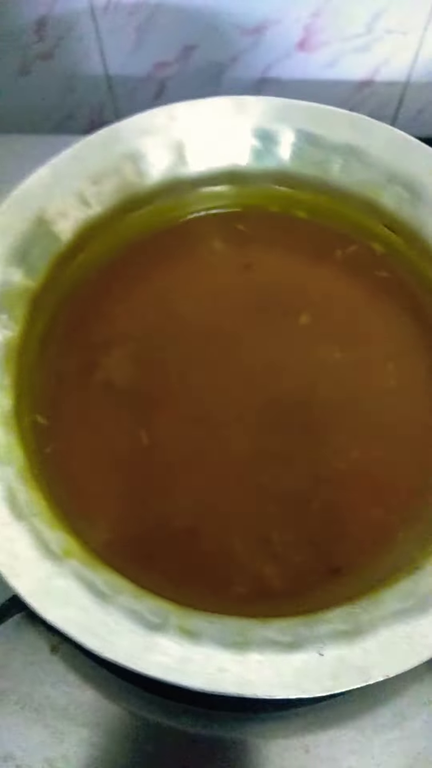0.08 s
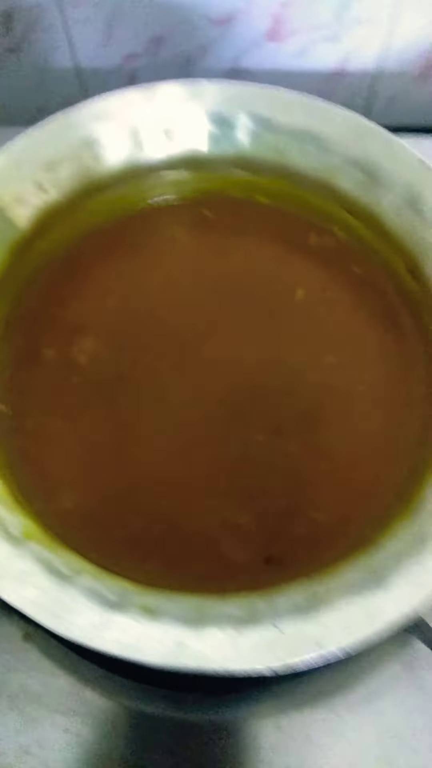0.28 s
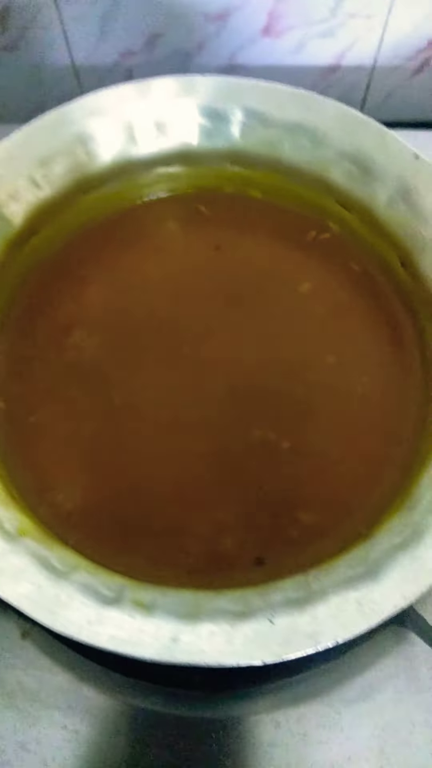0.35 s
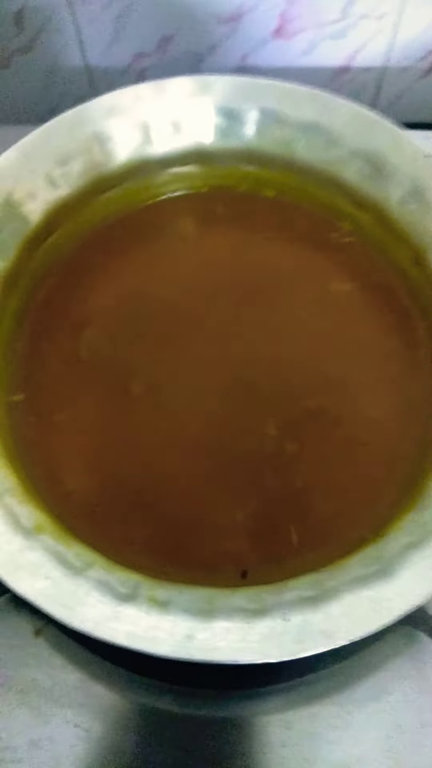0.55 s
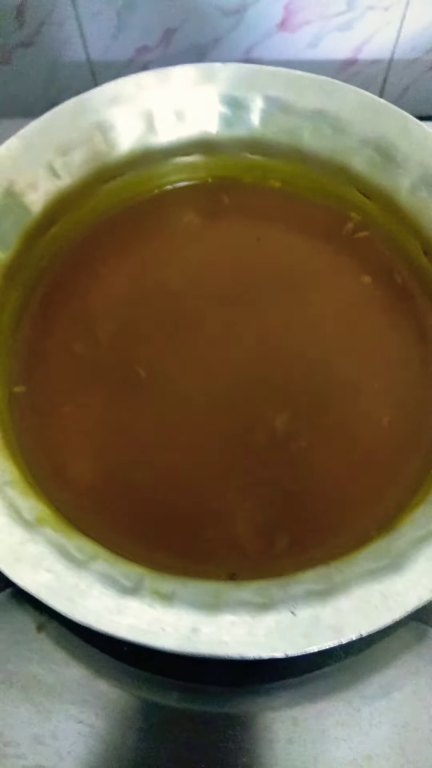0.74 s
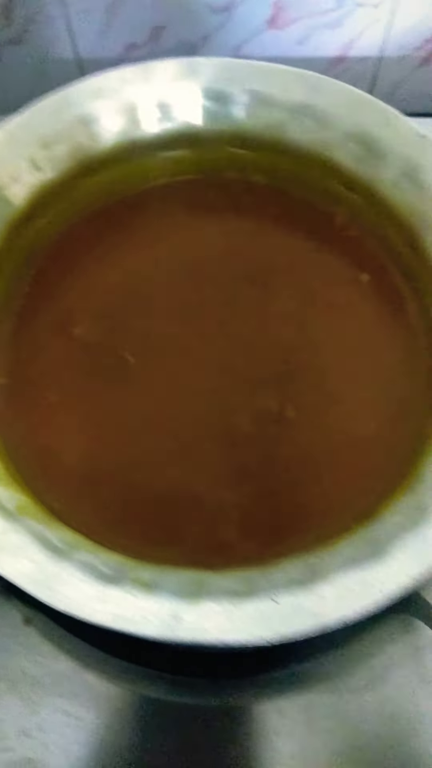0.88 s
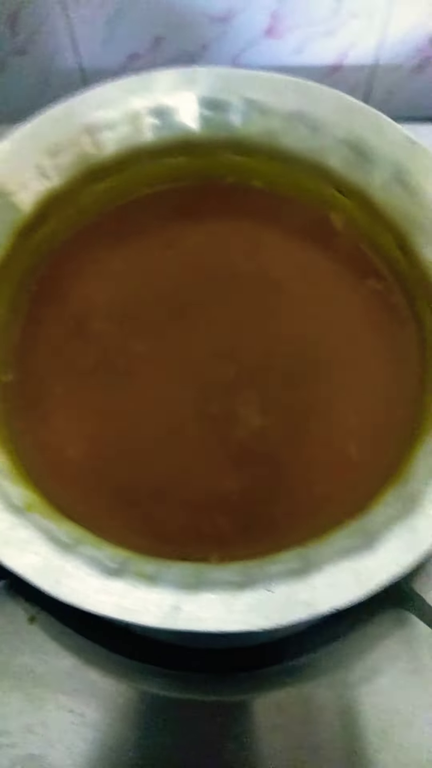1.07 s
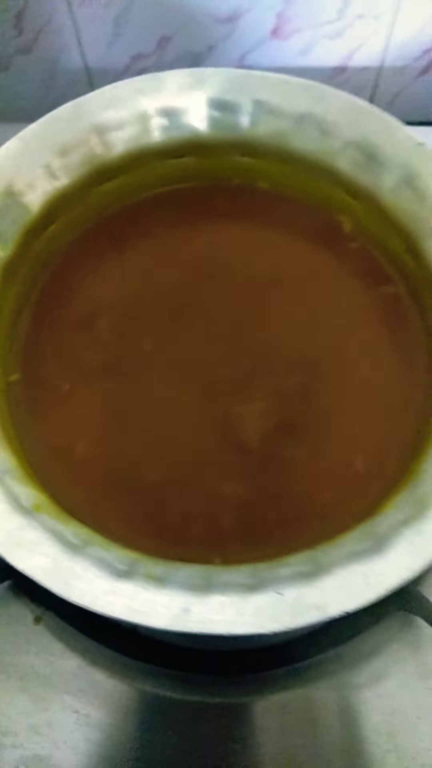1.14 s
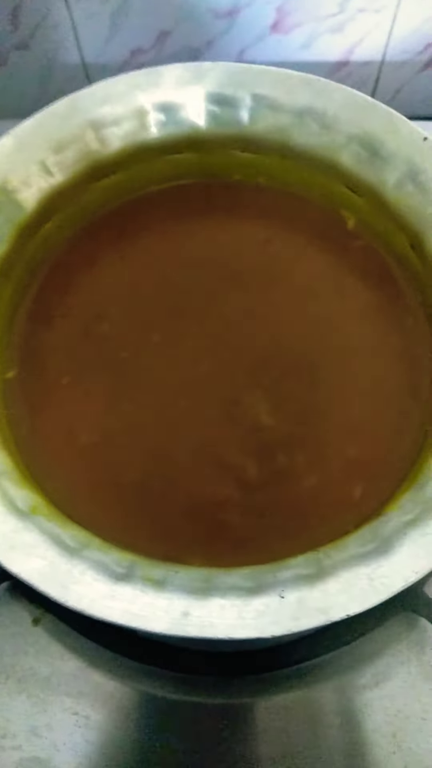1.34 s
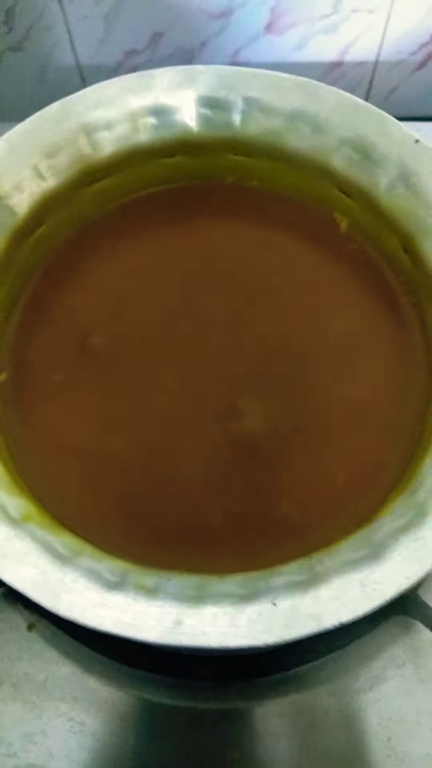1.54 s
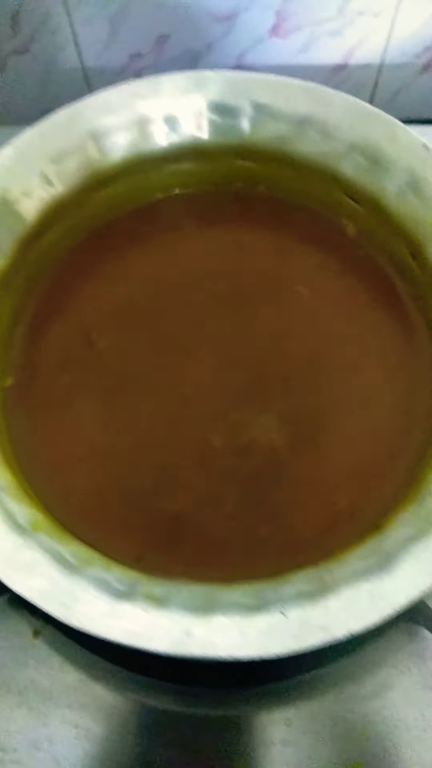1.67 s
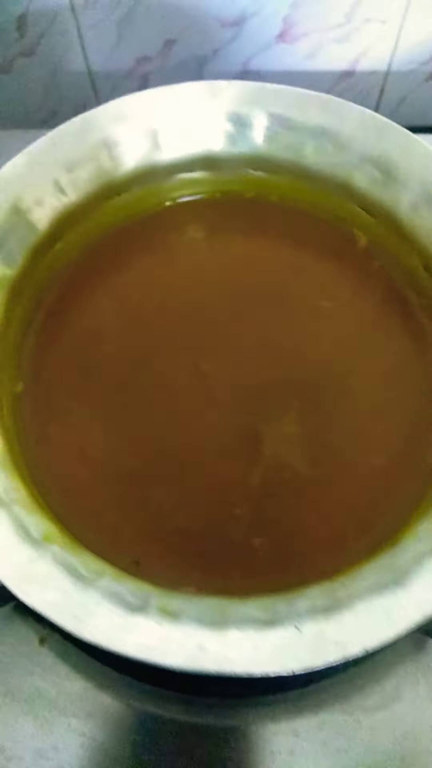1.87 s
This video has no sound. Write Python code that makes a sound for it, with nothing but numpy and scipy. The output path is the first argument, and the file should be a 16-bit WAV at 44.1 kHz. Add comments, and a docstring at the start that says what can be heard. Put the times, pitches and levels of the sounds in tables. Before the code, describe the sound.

Close up in a home kitchen, tongs clang against a heavy liquid-filled pot, rattle brightly and knock again within half a second, then only low wavering drone, quiet hum and tiny hollow blips remain.

```python
"""A full aluminium pot on a gas stove clangs under four knocks of metal tongs, two of them lighter.
Each knock mixes noisy clatter, dying tones, a low thud and a boom of the stove top.
The tongs clink in bright ticks of noise, with ringing blades and a short tiled-kitchen tail.
Behind them: soft blips made of sine tones and rustle, a faint mains hum, a wavering low drone,
a thin whine and room noise."""
import sys
import numpy as np
from scipy import signal
from scipy.fft import rfft, irfft
from scipy.io import wavfile
from scipy.ndimage import uniform_filter1d

SR = 44100
rng = np.random.default_rng(int(sys.argv[2]) if len(sys.argv) > 2 else 0)


def inscribe(sig):
    """Save sig as 16-bit PCM at rate SR to the path in sys.argv[1].

    A 1-D sig is mono; a 2-D sig holds one channel per row.
    Samples are clipped to [-1, 1] before scaling.
    """
    pcm = np.round(np.clip(np.atleast_2d(sig).T, -1, 1) * 32767)
    wavfile.write(sys.argv[1], SR, pcm.astype(np.int16))


N = 83790
T = np.arange(N) / SR  # time in seconds

# A t60 is the time a sound takes to fall by 60 dB.
# Levels in the tables apply before the attacks, the decays and the expander in record().


def amp(db):
    """Turns decibels into a gain."""
    return 10 ** (np.asarray(db) / 20)


def unit(x):
    """Scales a sound to an rms of 1."""
    return x / np.sqrt(np.mean(x ** 2) + 1e-20)


def read(points, hz):
    """Reads a table at any frequency, joining its points on a log-frequency axis."""
    point_hz, value = np.transpose(points)
    return np.interp(np.log(hz + 1), np.log(point_hz + 1), value)


def level_curve(points):
    """Joins (time, dB) points with straight lines, giving a level in dB at every moment."""
    return np.interp(T, *np.transpose(points))


def add(mix, start_s, sound):
    """Mixes a sound in at its start time, cutting it off at the end of the scene."""
    part = mix[max(round(start_s * SR), 0):][:len(sound)]
    part += sound[:len(part)]


def fade(t60_s, t=T):
    """Exponential decay, as in a struck object losing its energy."""
    return np.exp(-np.log(1000) * t / t60_s)


def rise(rise_s):
    """Straight-line attack from 0 to 1."""
    return np.minimum(T / max(rise_s, 1 / SR), 1)


TOP_FROM_HZ, TOP_FULL_HZ = 7500, 11000  # the treble lift begins, and is complete


def noise(colour, top_db=0):
    """Noise with random phases and a given colour; top_db raises or lowers its treble."""
    hz = np.fft.rfftfreq(N, 1 / SR)
    spectrum = np.exp(2j * np.pi * rng.random(len(hz))) * amp(read(colour, hz))
    lift = amp(read([(TOP_FROM_HZ, 0), (TOP_FULL_HZ, top_db)], hz))
    # level is set before the lift, so the lift leaves the lower range alone
    return irfft(spectrum * lift, N) / np.std(irfft(spectrum, N))


def drift(rate_hz):
    """Slow random movement of rms 1: noise with its fast changes smoothed away."""
    hz = np.fft.rfftfreq(N, 1 / SR)
    smooth = np.exp(-(hz / rate_hz) ** 2)
    return unit(irfft(rfft(rng.standard_normal(N)) * smooth, N))


def ring(modes, top_db=0):
    """Metal vibrates in several modes at once: each is a sine that dies at its own speed."""
    out = np.zeros(N)
    for pitch_hz, level_db, t60_s in modes:
        gain = amp(level_db + top_db * (pitch_hz > TOP_FULL_HZ))
        out += gain * fade(t60_s) * np.sin(2 * np.pi * (pitch_hz * T + rng.random()))
    return out


def wavering(levels, pitch_hz, wander_hz, rough):
    """A tone unsteady in pitch (rms wander_hz) and strength (rms rough), on a level curve."""
    turns = np.cumsum(pitch_hz + wander_hz * drift(39)) / SR
    tone = np.sin(2 * np.pi * turns) * (1 + rough * drift(40))
    return amp(level_curve(levels)) * unit(tone)


# knocks on the pot: start_s, clatter_db, clatter_rise_s, ring_db, boom_db, thud_db, thump_hz, thump_db
KNOCK_TABLE = [(0.2354, -23, 0.016, -21.5, -42, -27, 768.3, -23.5),
               (.377, -40.5, 0.0023, -53.5, -43.5, -58, 555, -35),
               (0.4863, -34, 0.0032, -43.5, -34, -57, 563.3, -27),
               (.5055, -44.5, .002, -46, -60.5, -57, 567, -36.5)]
# ringing modes of the pot: pitch_hz, level_db (relative), t60_s
POT_MODES = [(382, -7, .24), (456, -1, .3), (488, -4, .28), (524, -6, .4), (587, -2, .28), (623, -2, .3),
             (698, 2, .28), (813, -3, .26), (829, -1, .34), (863, -6, .38), (1029, -8, .32), (1352, -9, .3),
             (1478, -12, .3), (1641, -9, .3), (2676, -18, .28), (3911, -17, .3)]
RING_RISE_S = 0.0111


def pot():
    """Each knock swells into a dense clatter, rings the pot's modes and shakes the stove."""
    out = np.zeros(N)
    for start_s, clatter_db, rise_s, ring_db, boom_db, thud_db, thump_hz, thump_db in KNOCK_TABLE:
        add(out, start_s, clatter(clatter_db, rise_s))
        add(out, start_s, amp(thump_db) * thump(thump_hz))
        add(out, start_s, amp(ring_db) * ring(POT_MODES) * rise(RING_RISE_S))
        add(out, start_s, amp(boom_db) * boom())
        add(out, start_s, amp(thud_db) * thud())
    return out


# colour of the dense clatter of pot and grate: pitch_hz, level_db (per Hz, relative)
CLATTER_COLOUR = [(60, -44), (200, -15), (340, -18), (540, -1.5), (740, -9.5), (830, -3.5), (960, -9.5),
                  (1600, -11.5), (2050, -14), (3050, -16), (3400, -25), (5000, -17.5), (6700, -23),
                  (9200, -42.5), (13500, -41.5), (15000, -49.5)]


def clatter(level_db, rise_s):
    """Many small metal contacts blur into noise that starts partly up and swells."""
    swell = 0.28 + 0.83 * rise(rise_s)
    return amp(level_db) * die_away(noise(CLATTER_COLOUR)) * swell


# decay of sound in the kitchen: pitch_hz, t60_s
KITCHEN_DECAY = [(100, 0.45), (600, 0.38), (1200, 0.37), (2500, 0.34), (6500, 0.32), (10000, 0.33),
                 (15000, .33)]


def die_away(x):
    """Lets each frequency band decay at the speed it has in the kitchen."""
    hz, t, bands = signal.stft(x, SR, nperseg=256)
    band_t60_s = read(KITCHEN_DECAY, hz)[:, None]
    return signal.istft(bands * fade(band_t60_s, t), SR)[1][:N]


THUMP_WIDTH_HZ, THUMP_T60_S, THUMP_RISE_S = 120, 0.14, 0.0073


def thump(pitch_hz):
    """A brief band of noise around a pitch that depends on the spot struck."""
    # two slow drifts on a sine and a cosine spread the tone into a narrow band
    sine_part = drift(THUMP_WIDTH_HZ) * np.sin(2 * np.pi * pitch_hz * T)
    cosine_part = drift(THUMP_WIDTH_HZ) * np.cos(2 * np.pi * pitch_hz * T)
    return unit(sine_part + cosine_part) * fade(THUMP_T60_S) * rise(THUMP_RISE_S)


# colour of the stove's rumble under the boom: pitch_hz, level_db (per Hz, relative)
RUMBLE_COLOUR = [(20, -16), (55, -7), (110, 3), (170, -5), (300, -34.5), (1000, -70)]
RUMBLE_DB, RUMBLE_T60_S = -11.5, .85  # level relative to the boom's tone
BOOM_HZ, BOOM_WANDER_HZ, BOOM_ROUGH = 143.55, 2, .15
BOOM_RISE_S, BOOM_T60_S = .014, .9
BOOM_HOLD_S, BOOM_STOP_T60_S = .145, .17  # after the hold, this extra decay sets in


def boom():
    """The heavy pot shakes on the stove top for a moment, then settles."""
    shake = wavering([(0, 0.0083)], BOOM_HZ, BOOM_WANDER_HZ, BOOM_ROUGH) * fade(BOOM_T60_S)
    settle = fade(BOOM_STOP_T60_S, np.maximum(T - BOOM_HOLD_S, 0))
    rumble = amp(RUMBLE_DB) * noise(RUMBLE_COLOUR) * fade(RUMBLE_T60_S)
    return rise(BOOM_RISE_S) * (shake * settle + rumble)


# colour of the grate's low thud: pitch_hz, level_db (per Hz, relative)
THUD_COLOUR = [(25, -50.5), (65, -28.5), (110, -6.5), (180, -5), (240, -1), (380, -0.5), (700, -25),
               (2000, -50.5)]
THUD_T60_S, THUD_RISE_S = 0.31, 0.0033


def thud():
    """The grate gives a low thud: dark noise with a quick attack and a short decay."""
    return noise(THUD_COLOUR) * fade(THUD_T60_S) * rise(THUD_RISE_S)


# clinks of the tongs: start_s, level_db, treble_lift_db, tick_t60_s, room_db (relative to the tick)
CLINK_TABLE = [(0.2366, -32.5, 1, 0.062, -7.5), (0.2401, -29, -0.5, 0.077, -9.5),
               (0.3223, -40.5, 8, 0.025, -13), (.334, -34.5, 1.5, 0.025, -8.5), (0.346, -43, -2, .03, -5.5),
               (0.379, -42.5, -3, .035, -8), (0.3841, -49, 6, 0.022, -9),
               (0.4864, -25.5, -11, 0.014, -11.5), (0.493, -42, 1.5, 0.034, -8.5),
               (.5008, -36, 11, 0.055, -13)]
# colour of the tongs: pitch_hz, level_db (per Hz, relative)
TONGS_COLOUR = [(300, -25.5), (1200, 1), (2700, -3.5), (3600, -8.5), (5000, -8.5), (6500, 4), (7800, -5.5),
                (9300, -15.5), (11300, -16), (13000, -19.5), (14200, -22), (15500, -37)]
# ringing modes of the tongs' blades: pitch_hz, level_db (relative), t60_s
BLADE_MODES = [(1938, -14, .33), (2730, -18, .28), (5870, -18, .3), (5995, -18, .3), (6400, -17, .33),
               (6768, -15, .34), (12850, -32, .32)]
BLADES_DB = 3  # blades against the room tail


def tongs():
    """Each contact is a short bright tick, the ring of the blades and a tail from the room."""
    out = np.zeros(N)
    for start_s, level_db, top_db, tick_t60_s, room_db in CLINK_TABLE:
        tick = noise(TONGS_COLOUR, top_db) * fade(tick_t60_s)
        tail = die_away(noise(TONGS_COLOUR, top_db))
        blades = amp(BLADES_DB) * ring(BLADE_MODES, top_db)
        add(out, start_s, amp(level_db) * (tick + amp(room_db) * (tail + blades)))
    return out


# soft blips: start_s, level_db, low_partial_db (relative), rustle_db (relative)
BLIP_TABLE = [(.728, -58, -28, -28), (1.0, -59, -20.5, -12.5), (1.391, -57, -3, -11),
              (1.877, -62, -22, -22)]
# colour of the rustle with each blip: pitch_hz, level_db (per Hz, relative)
RUSTLE_COLOUR = [(200, -19), (480, -6), (1100, -3), (2000, -15), (5000, -29)]
RUSTLE_RISE_S, RUSTLE_T60_S = 0.046, 0.56
BLIP_HZ, BLIP_WANDER_HZ, BLIP_LOW_HZ = 810, 18, 491.6
BLIP_RISE_S, BLIP_HOLD_S, BLIP_T60_S = .002, .018, .1


def blips():
    """Soft, short, hollow notes of two sine partials, each trailed by a faint rustle."""
    out = np.zeros(N)
    shape = rise(BLIP_RISE_S) * fade(BLIP_T60_S, np.maximum(T - BLIP_HOLD_S, 0))
    for start_s, level_db, low_db, rustle_db in BLIP_TABLE:
        note = np.sin(2 * np.pi * np.cumsum(BLIP_HZ + BLIP_WANDER_HZ * drift(77)) / SR)
        low = amp(low_db) * np.sin(2 * np.pi * BLIP_LOW_HZ * T)
        rustle = amp(rustle_db) * noise(RUSTLE_COLOUR) * rise(RUSTLE_RISE_S) * fade(RUSTLE_T60_S)
        add(out, start_s, amp(level_db) * (shape * (note + low) + rustle))
    return out


# level of the low drone over time: time_s, level_db
DRONE_LEVELS = [(0, -65.5), (.14, -49.5), (.19, -55), (.6, -53.5), (.72, -61.5), (.8, -49.5), (.875, -60),
                (.97, -49), (1.01, -54), (1.055, -51), (1.095, -69.5), (1.145, -55), (1.19, -70.5),
                (1.232, -47), (1.34, -76), (1.47, -83), (1.512, -54.5), (1.57, -64), (1.71, -53),
                (1.77, -64), (1.835, -52.5), (1.9, -55)]
# colour of the noise around the drone: pitch_hz, level_db (per Hz, relative)
SKIRT_COLOUR = [(30, -26), (90, -4.5), (150, 9), (210, 3), (290, -4.5), (380, -23.5), (1000, -53)]
SKIRT_DB = -6  # relative to the drone
DRONE_HZ, DRONE_WANDER_HZ, DRONE_ROUGH = 205.1, 9, 0.12


def drone():
    """A low tone wavers in pitch and strength, and a skirt of noise follows its level."""
    tone = wavering(DRONE_LEVELS, DRONE_HZ, DRONE_WANDER_HZ, DRONE_ROUGH)
    skirt = amp(SKIRT_DB + level_curve(DRONE_LEVELS)) * noise(SKIRT_COLOUR)
    return tone + skirt


# steady partials of the mains hum: pitch_hz, level_db
HUM_PARTIALS = [(300, -60.5), (400, -73.5), (500, -83.5), (600, -79), (1700, -87.5)]


def hum():
    """Mains hum: steady sines, each with a random starting phase."""
    out = np.zeros(N)
    for pitch_hz, level_db in HUM_PARTIALS:
        out += amp(level_db) * unit(np.sin(2 * np.pi * (pitch_hz * T + rng.random())))
    return out


# level of the thin whine over time: time_s, level_db
WHINE_LEVELS = [(0, -94), (.7, -93), (.755, -75), (.81, -78), (.88, -94), (1.3, -94), (1.37, -80),
                (1.44, -94), (1.61, -93), (1.685, -73), (1.73, -71), (1.78, -80), (1.81, -76), (1.9, -88)]


def whine():
    """A thin high tone, unsteady in pitch and strength, comes and goes."""
    return wavering(WHINE_LEVELS, pitch_hz=2303, wander_hz=20, rough=.45)


# colour of the room noise: pitch_hz, level_db (per Hz, relative)
AIR_COLOUR = [(15, -24), (35, -8), (62, 3.5), (120, 1), (220, -14), (340, -2), (480, -12.5), (750, -14.5),
              (1500, -19.5), (3000, -22), (7000, -26.5), (15000, -30)]
AIR_DB = -67


def room_noise():
    """Steady, mostly low noise fills the room."""
    return amp(AIR_DB) * noise(AIR_COLOUR)


def scene():
    """Pot and tongs over the kitchen's background, as one channel."""
    background = blips() + drone() + hum() + whine() + room_noise()
    return (pot() + tongs() + background)[None]


GATE_DB, GATE_RANGE_DB = -41.5, 4.5  # quieter sound is lowered, by this much at most
GATE_SLOPE = 0.39  # dB of lowering for each dB below GATE_DB
EDGE_HZ = 15600  # upper band limit


def record(dry):
    """A mild expander holds loud sound up and lets quiet tails drop; then the band limit."""
    power = abs(uniform_filter1d(dry[0] ** 2, size=1100))  # averaged over 25 ms
    power_db = 10 * np.log10(power + 1e-12)
    gain_db = np.clip((power_db - GATE_DB) * GATE_SLOPE, -GATE_RANGE_DB, 0)
    out = dry * amp(gain_db)
    low_pass = signal.firwin(511, EDGE_HZ, window=("kaiser", 9), fs=SR)
    return signal.oaconvolve(out, low_pass[None], "same")


dry = scene()
out = record(dry)
inscribe(out)
```